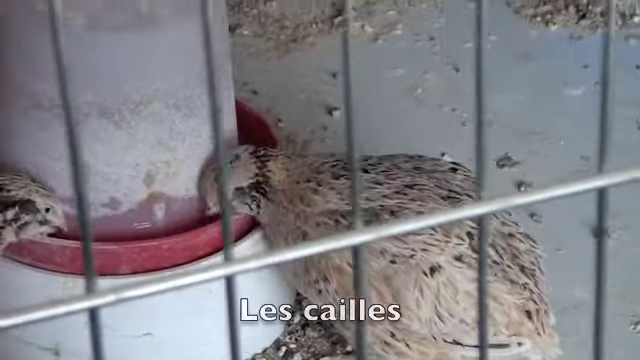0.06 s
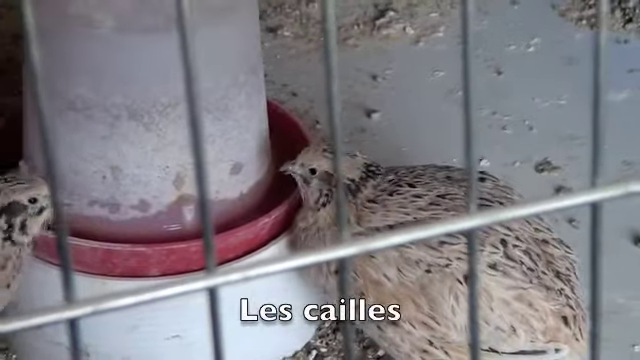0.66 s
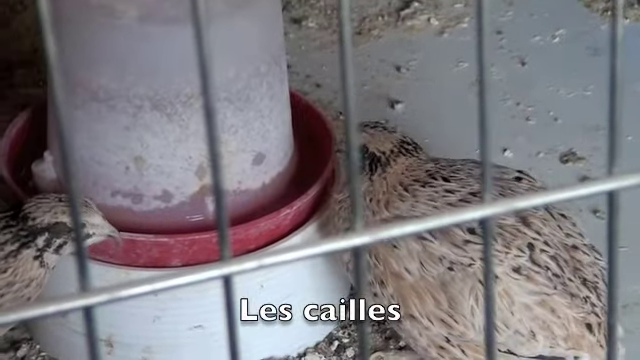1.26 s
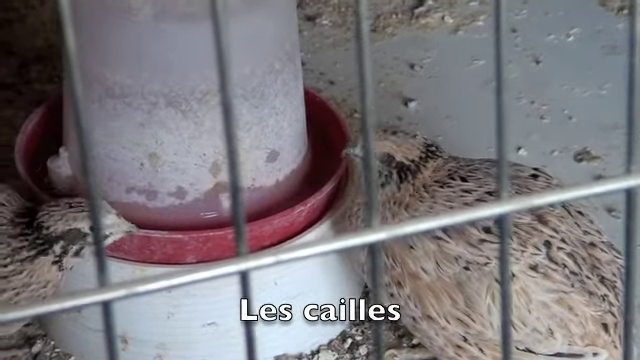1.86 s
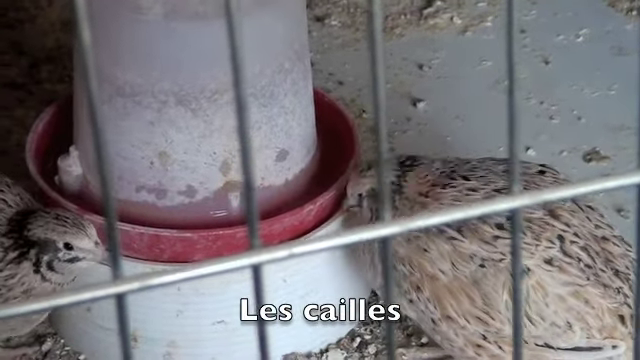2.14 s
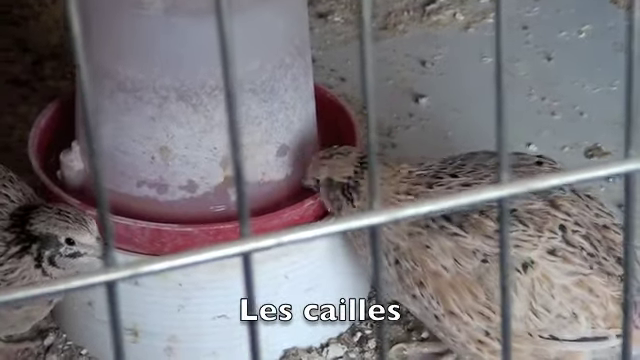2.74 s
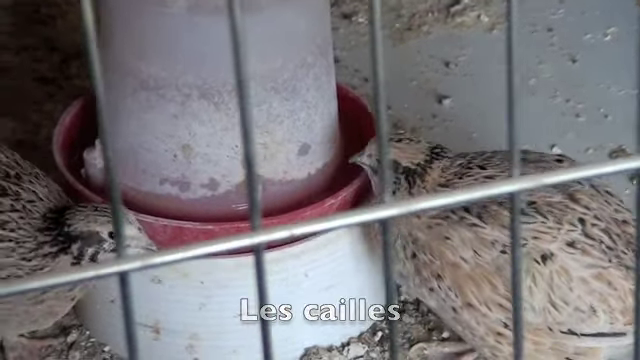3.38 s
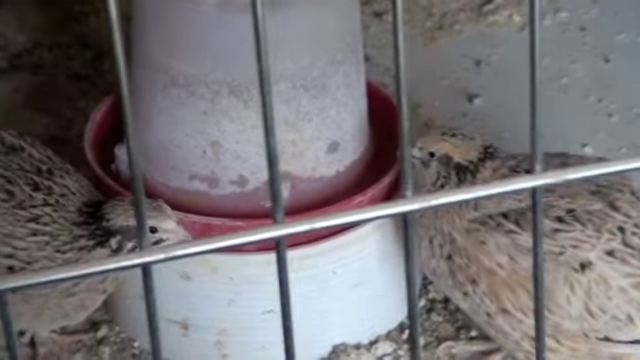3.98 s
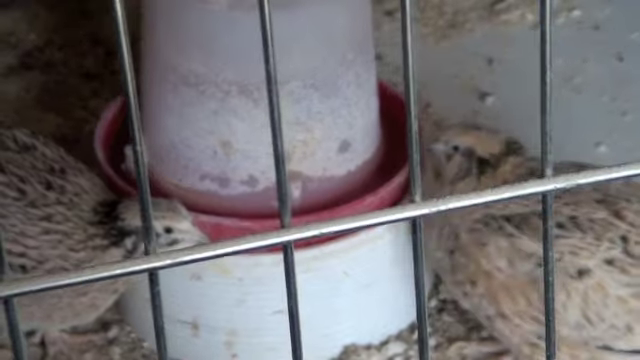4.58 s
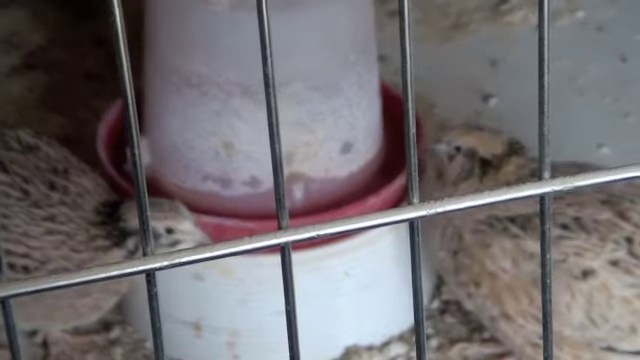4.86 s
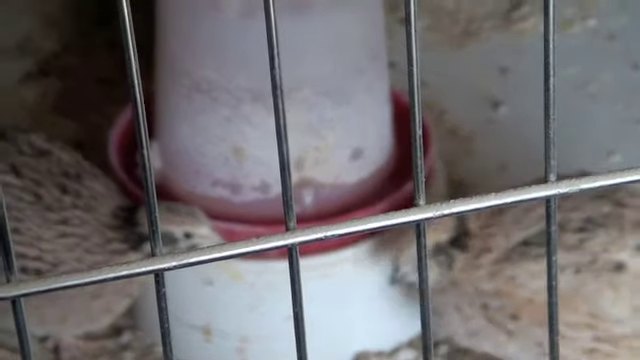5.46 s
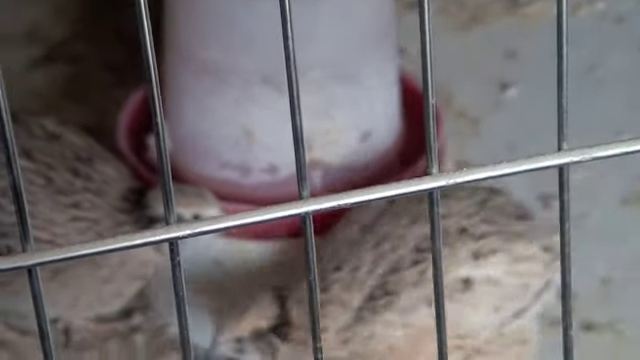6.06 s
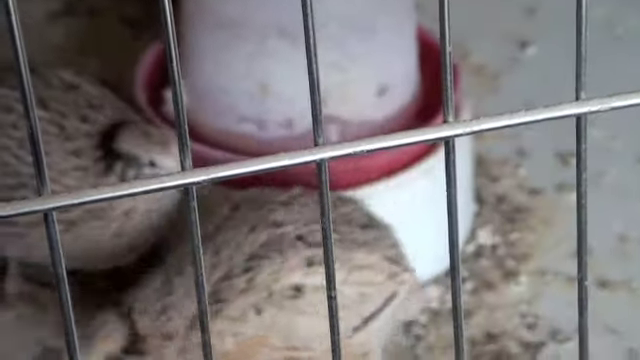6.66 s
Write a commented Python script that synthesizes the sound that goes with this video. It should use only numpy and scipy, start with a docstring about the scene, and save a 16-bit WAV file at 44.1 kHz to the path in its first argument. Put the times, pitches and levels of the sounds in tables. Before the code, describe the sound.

Small birds peck and step in a cage near the microphone, indoors. Sharp little taps on a plastic feeder mix with claw scrapes and gritty rustling, and a ringing footfall stands out early on. Short, quiet gliding peeps come before and after a cluster of louder pecks in the middle. The activity then softens to shuffling and dull floor taps, over steady hiss, low rumble, faint hum and a thin high whine.

```python
"""Quail peck and step in a wire cage, close by: beaks tap the plastic feeder and the floor, claws skid,
footfalls make the floor thud and ring, and dull bumps hit the cage. Feet and feathers stir the litter
into gritty clicks, and a bird peeps softly in short gliding whistles. A small hard room answers the taps.
Under it lie low rumble, hiss, a faint hum and a thin electronic whine."""
import sys
import numpy as np
from scipy import signal
from scipy.fft import rfft, irfft, next_fast_len
from scipy.io import wavfile
from scipy.ndimage import uniform_filter1d, map_coordinates

SR = 44100
rng = np.random.default_rng(int(sys.argv[2]) if len(sys.argv) > 2 else 0)


def wav_record(signal):
    """Record a signal, one row per channel, as 16-bit PCM in the file named by sys.argv[1]."""
    frames = np.transpose(np.atleast_2d(signal))
    bounded = np.clip(frames, -1, 1)
    # unit amplitude maps onto the largest positive 16-bit level
    quanta = np.round(bounded * 32767).astype(np.int16)
    wavfile.write(sys.argv[1], SR, quanta)


N = 296746

# Spectrum of stirred litter. Each row: frequency in Hz, relative density in dB.
LITTER_SPECTRUM = [(100, -24), (300, 11.5), (800, 3.5), (2000, 1), (4500, -0.5), (8000, -2.5), (15000, -1)]
# Stereo likeness of the room's sound. Each row: frequency in Hz, left-right correlation.
ROOM_CORRELATION = [(150, 0.85), (600, 0.53), (2500, 0.6), (4500, 0.86), (8000, 0.045), (14000, 0.12)]


def feeder_pecks(gain_db=-15, knock_db=-15, knock_follows=0.51, tick_db=-8):
    """Beaks tap the plastic feeder; in a bright tap the edge stands out over the body."""
    # Each row: start in seconds, relative level in dB, body and edge resonances in Hz,
    # brightness in dB, resonance height in dB, room tail offset in dB.
    pecks = [(0.125, -40.5, 1780, 5440, 4.5, 6.5, -5.5), (0.326, -43.5, 1480, 3700, -0.5, 7, -4),
             (0.358, -27.5, 1190, 3500, -20.5, 10.5, -2), (1.823, -38, 1800, 2190, -4, 10.5, 1),
             (1.962, -39, 790, 2600, -0.5, 2.5, -2), (2.992, -33.5, 1300, 3320, -7.5, 8, -3),
             (3.156, -22.5, 1680, 2440, -12, 11, -1.5), (3.398, -23.5, 1070, 6640, -3.5, 2.5, -3.5),
             (3.575, -48, 1720, 2240, 3.5, 11, -2.5)]
    out = np.zeros((2, N))
    for start_s, db, body_hz, edge_hz, bright_db, ring_db, wet_db in pecks:
        bands_db = (knock_db + knock_follows * bright_db, 0, bright_db, bright_db + tick_db)
        blow = contact(body_hz, edge_hz, bands_db, ring_db, top_hz=7100, travel_s=0.00093)
        add(out, amp(db + gain_db) * room(blow, wet_db, lag_s=0.000042), start_s)
    return out


def floor_pecks(gain_db=-15, knock_db=-17, tick_db=-22):
    """Beaks tap the littered floor: light, dull, hardly any tick."""
    # Each row: start in seconds, relative level in dB, body resonance in Hz, brightness in dB.
    pecks = [(5.281, -40, 800, -5.5), (5.803, -45, 870, -0.5), (6.148, -50.5, 820, -24),
             (6.247, -55, 640, -13)]
    out = np.zeros((2, N))
    for start_s, db, body_hz, bright_db in pecks:
        bands_db = (knock_db, 0, bright_db, bright_db + tick_db)
        blow = contact(body_hz, edge_hz=1370, bands_db=bands_db, ring_db=10, top_hz=5560,
                       travel_s=0.00094)
        add(out, amp(db + gain_db) * room(blow, wet_db=-3.5), start_s)
    return out


def steps(scuff_db=-17.5, knock_db=-7, tick_db=-15, floor_db=-14, weight_db=-11, weight_hz=165):
    """A bird's weight lands with a scuff; the heavier the step, the more the floor thuds and rings."""
    # Each row: start in seconds, relative level in dB, body resonance in Hz, brightness in dB.
    footfalls = [(0.293, -42, 666, -1), (1.648, -28.5, 890, -6.5), (1.711, -40.5, 1780, 1),
                 (1.823, -33.5, 693, -2.5), (2.062, -16, 1000, -10), (4.847, -29.5, 760, -8.5),
                 (5.197, -41, 696, -10), (5.482, -49, 880, -10)]
    out = np.zeros((2, N))
    for start_s, db, body_hz, bright_db in footfalls:
        bands_db = (knock_db, 0, bright_db, bright_db + tick_db)
        click = contact(body_hz, edge_hz=1860, bands_db=bands_db, ring_db=12, top_hz=4960,
                        travel_s=0.00067)
        blow = scuff(click, decay_s=0.0027, catch=0.73)
        add(out, amp(db + scuff_db) * room(blow, wet_db=1), start_s)
        add(out, amp(db + floor_db) * floor_ring(), start_s)
        add(out, amp(db + weight_db) * thud(weight_hz), start_s)
    return pan_left(out, db=1.2)


def scratches(gain_db=-16, knock_db=-13, edge_db=-3, edge_follows=0.14, tick_db=-10):
    """Claws skid on the floor; sharpness lifts the tick most and the edge a little."""
    # Each row: start in seconds, relative level in dB, sharpness in dB.
    skids = [(0.024, -50, 14), (0.336, -34.5, -10), (0.44, -41.5, -3), (0.471, -42.5, -28),
             (0.524, -48.5, 10), (1.603, -42.5, 7.5), (1.75, -43, -11), (1.915, -44.5, 1),
             (3.527, -34, -7.5), (3.547, -42.5, -1), (3.654, -37.5, -10.5), (3.69, -39.5, -4.5),
             (3.756, -43, -3), (3.984, -44, -8), (4.038, -46, 1.5), (4.758, -47.5, 1), (6.373, -51, 4)]
    out = np.zeros((2, N))
    for start_s, db, sharp_db in skids:
        bands_db = (knock_db, 0, edge_db + edge_follows * sharp_db, tick_db + sharp_db)
        click = contact(body_hz=1680, edge_hz=3460, bands_db=bands_db, ring_db=3.5, top_hz=5160,
                        travel_s=0.00063)
        blow = scuff(click, decay_s=0.0034, catch=0.59)
        add(out, amp(db + gain_db) * room(blow), start_s)
    return out


def cage_bumps():
    """Dull bumps against the cage."""
    # Each row: start in seconds, level in dB before panning, frequency in Hz.
    bumps = [(0.096, -42, 248), (0.744, -44.5, 240), (2.062, -31, 100), (3.345, -42, 56),
             (3.634, -39.5, 414), (4.683, -39, 63), (4.836, -32, 283)]
    out = np.zeros((2, N))
    for start_s, db, hz in bumps:
        add(out, amp(db) * thud(hz), start_s)
    return pan_left(out, db=3.5)


def contact(body_hz, edge_hz, bands_db, ring_db, top_hz, travel_s):
    """A blow of a few cycles: two damped resonances stand on a broad click."""
    knock, body, edge, tick = bands_db
    click_db = [(50, knock - 6), (140, knock + 12), (0.5 * body_hz, knock + 12),
                (0.81 * body_hz, body + 9 - ring_db / 2), (2300, body + 8 - ring_db / 2),
                (3200, edge + 5), (top_hz, edge + 3),
                (1.61 * top_hz, tick + 6), (13000, tick + 4), (16000, tick - 6)]

    def gain(hz):
        peak = lambda centre_hz, width: 1 / (1 + (np.log((hz + 1) / centre_hz) / width) ** 2)
        resonances = peak(body_hz, width=0.097) + 0.99 * peak(edge_hz, width=0.24)
        return amp(log_interp(click_db, hz) + ring_db * resonances)

    # Bending waves disperse: treble arrives first, 1 kHz after travel_s.
    dispersion = lambda hz: np.exp(-4j * np.pi * travel_s * np.sqrt(1000 * hz))
    return np.sqrt(SR) * filtered(min_phase_pulse(gain), dispersion)


def scuff(click, decay_s, catch, size=2048):
    """A claw catches, then skids through tiny contacts: the click smears but keeps its colour."""
    contacts = rng.standard_normal(size) * np.exp(-np.arange(size) / SR / decay_s)
    contacts[0] = catch * np.linalg.norm(contacts)
    spectrum = rfft(contacts)
    whitened = spectrum / np.sqrt(uniform_filter1d(np.abs(spectrum) ** 2, size=5))
    return signal.fftconvolve(click, irfft(whitened)[:size // 2])


def floor_ring(spread_db=1.2, attack_s=0.001, size=SR // 3):
    """The cage floor's modes ring at slightly new strengths with every blow."""
    # Each row: frequency in Hz, relative level in dB, T60 in seconds.
    modes = [(91, -14, 0.071), (173, -27, 0.16), (331, -1, 0.26), (462, -4, 0.33), (632, 1, 0.22),
             (755, -0.5, 0.28), (870, 2.5, 0.26), (1020, -12, 0.28), (1660, -14, 0.28), (1970, -22, 0.22),
             (2184, -16, 0.22), (3730, -13, 0.23), (4400, -32, 0.11)]
    hz, db, t60_s = np.transpose(modes)[:, :, None]
    t = np.arange(size) / SR
    decay = amp(db + spread_db * rng.standard_normal(hz.shape) - 60 * t / t60_s)
    partials = decay * np.sin(2 * np.pi * (hz * t + rng.random(hz.shape)))
    return partials.sum(axis=0) * (1 - np.exp(-t / attack_s))


def thud(hz, cycles=2.1, size=SR // 4):
    """A soft push: a sine that swells and dies within a few cycles."""
    turns = hz * np.arange(size) / SR
    age = turns / cycles
    return np.sin(2 * np.pi * turns) * 2 * age * np.exp(1 - 2 * age)


def litter_strokes(grains_per_s=700, spread_db=5, swish=0.27, size=SR // 2):
    """Feet and feathers sweep the litter: uneven clicks of grit in a swish that swells and fades."""
    # Each row: peak time in seconds, level in dB, half length in seconds, colour centre in Hz.
    strokes = [(0.013, -43.5, 0.033, 3200), (0.274, -45.5, 0.042, 2940), (0.343, -40.5, 0.016, 1800),
               (0.903, -53.5, 0.018, 3000), (1.687, -37, 0.045, 870), (1.743, -50.5, 0.1, 6000),
               (1.894, -42.5, 0.01, 5100), (2.154, -45.5, 0.032, 10000), (2.301, -51.5, 0.026, 4040),
               (2.999, -51.5, 0.17, 1940), (3.363, -45, 0.11, 1550), (3.756, -49, 0.34, 1290),
               (3.932, -45, 0.044, 2760), (4.191, -51, 0.016, 1970), (4.81, -41.5, 0.081, 1530),
               (4.871, -40.5, 0.024, 1000), (4.965, -47.5, 0.054, 1760), (5.131, -51, 0.044, 4270),
               (5.428, -54.5, 0.082, 4050), (5.757, -51.5, 0.089, 2800)]
    out = np.zeros((2, N))
    t = (np.arange(size) - size // 2) / SR
    for peak_s, db, half_s, centre_hz in strokes:
        grains = (rng.random(size) < grains_per_s / SR) * rng.standard_normal(size)
        grains *= amp(spread_db * np.minimum(rng.exponential(size=size), 2))
        grit = litter_colour(unit_rms(grains) + swish * rng.standard_normal(size), centre_hz)
        stroke = grit * amp(db) * np.exp(-(t / half_s) ** 2)
        add(out, room(stroke[t >= -peak_s]), peak_s + t[0])
    return out


def shuffle(swing_db=3, swing_per_s=12):
    """Restless birds shift about in the litter: a soft, uneven rustle."""
    # Each row: time in seconds, level in dB.
    contour = [(3.5, -66.5), (5.2, -60), (5.8, -58.5), (6.73, -64.5)]
    times_s, levels_db = np.transpose(contour)
    db = np.interp(np.arange(N) / SR, times_s, levels_db, left=-200, right=-200)
    envelope = amp(db + swing_db * wobble(swing_per_s))
    return envelope * litter_colour(stereo_noise(ROOM_CORRELATION), centre_hz=1100)


def litter_colour(x, centre_hz, focus_db=3):
    """Give x the litter's spectrum, focused around centre_hz, at rms 1."""
    cut_db = lambda hz: focus_db * np.minimum(np.log2((hz + 1) / centre_hz) ** 2, 4)
    return unit_rms(filtered(x, lambda hz: amp(log_interp(LITTER_SPECTRUM, hz) - cut_db(hz))))


def peeps(quaver=0.034, quaver_per_s=495, rasp_db=2, rasp_per_s=268, overtone_db=-22):
    """A bird's thin, slightly hoarse whistles: each swells and fades as its pitch bends in one arc."""
    # Each row: start and length in seconds, first, middle and last pitch in Hz, level in dB.
    calls = [(2.595, 0.066, 1580, 1690, 1470, -52), (2.638, 0.03, 1590, 2130, 2230, -52),
             (2.728, 0.035, 2470, 3000, 2730, -45), (2.769, 0.0403, 2780, 2170, 2510, -44),
             (4.14, 0.021, 1880, 2130, 1950, -52), (4.25, 0.042, 2940, 2450, 2060, -47.5),
             (4.287, 0.025, 2530, 2350, 2550, -46.5), (5.88, 0.15, 3150, 3400, 3850, -59)]
    out = np.zeros((2, N))
    for start_s, length_s, first_hz, middle_hz, last_hz, db in calls:
        progress = np.linspace(0, 1, round(length_s * SR))
        arc = np.polyfit([0, 0.5, 1], [first_hz, middle_hz, last_hz], 2)
        pitch_hz = np.polyval(arc, progress) * (1 + quaver * wobble(quaver_per_s, len(progress)))
        phase = 2 * np.pi * np.cumsum(pitch_hz) / SR
        swell = np.abs(np.sin(np.pi * progress)) ** 0.51
        envelope = swell * amp(db + rasp_db * wobble(rasp_per_s, len(progress)))
        voice = envelope * (np.sin(phase) + amp(overtone_db) * np.sin(2 * phase))
        add(out, room(voice, wet_db=-5), start_s)
    return out


def room(sound, wet_db=0, lag_s=0.000025, bounce=0.66, bounce_s=0.0018, build_s=0.0023, size=SR // 3):
    """A fresh stereo path through the small hard room: direct sound, floor bounce, dense tail."""
    # Each row: frequency in Hz, T60 in seconds.
    decay_times = [(150, 0.18), (600, 0.32), (1200, 0.25), (2000, 0.28), (4500, 0.27), (9000, 0.21),
                   (15000, 0.17)]
    # Each row: frequency in Hz, tail level re the direct sound in dB before wet_db.
    tail_levels = [(200, 12), (1000, 6), (2000, 3.5), (4500, 10.5), (9000, 6), (15000, 7)]
    hz, t, noise = signal.stft(stereo_noise(ROOM_CORRELATION, size), SR, nperseg=128)
    t60_s = log_interp(decay_times, hz)[:, None]
    fade = amp(log_interp(tail_levels, hz)[:, None] + wet_db - 60 * t / t60_s)
    fade *= np.sqrt(2 * np.log(1000) / (t60_s * SR))  # tail energy independent of T60
    path = signal.istft(noise * fade, SR, nperseg=128)[1][:, :size]
    path *= 1 - np.exp(-(np.arange(size) / SR / build_s) ** 2)
    path[:, 0] += 1
    path[:, round(bounce_s * SR * np.exp(0.15 * rng.standard_normal()))] += bounce
    path[1] = np.roll(path[1], round(lag_s * SR))  # the left microphone is reached first
    path /= np.sqrt(np.sum(path ** 2) / 2)
    return signal.fftconvolve(sound[None], path, axes=1)


def rumble(level_db=-43.5, swing_db=1.5, swing_per_s=2.71):
    """Low noise whose level wanders slowly."""
    # Each row: frequency in Hz, relative density in dB.
    spectrum = [(5, 2.5), (14, 7.5), (22, 8), (34, -8.5), (52, -1.5), (72, -8.5), (105, -12), (160, -19),
                (280, -17), (600, -38)]
    noise = stereo_noise(correlation=[(24, -0.17), (45, 0.92), (200, 0.06)])
    low = unit_rms(filtered(noise, lambda hz: amp(log_interp(spectrum, hz))))
    return amp(level_db + swing_db * wobble(swing_per_s)) * low


def room_tone(level_db=-57, band_hz=5200, width_hz=300, band_db=5):
    """Steady room noise and hiss with one faint narrow band."""
    # Each row: frequency in Hz, relative density in dB.
    spectrum = [(71, -44.5), (120, -13), (173, -20), (203, -12.5), (270, -21.5), (311, -18.5), (414, -12.5),
                (776, -13.5), (1510, -23), (1640, -16.5), (1820, -21.5), (3210, -22), (5010, -22.5),
                (12200, -30), (15300, -27)]
    # Each row: frequency in Hz, left-right correlation.
    correlation = [(150, 0.26), (500, 0.092), (1400, 0.22), (4000, 0.39), (8000, 0.021), (15000, 0.18)]
    lift_db = lambda hz: band_db * np.exp(-((hz - band_hz) / width_hz) ** 2)
    hiss = filtered(stereo_noise(correlation), lambda hz: amp(log_interp(spectrum, hz) + lift_db(hz)))
    return amp(level_db) * unit_rms(hiss)


def hum(hz=206.6, level_db=-62, drift_rad=0.19, swing_db=2.5):
    """A faint tone, slightly unsteady in phase and level."""
    tone = np.sin(2 * np.pi * hz * np.arange(N) / SR + drift_rad * wobble(3.95))
    return pan_left(tone * amp(level_db + swing_db * wobble(1.3)), db=1.5)


def whine(gain_db=2, drift_rad=0.2):
    """A thin electronic whistle: three close tones beat fifty times a second."""
    # Each row: frequency in Hz, relative level in dB.
    tones = [(15575, -71), (15625, -62), (15675, -71)]
    t = np.arange(N) / SR
    return sum(amp(db + gain_db) * np.sin(2 * np.pi * hz * t + drift_rad * wobble(60))
               for hz, db in tones)


def amp(db):
    """Decibels to gain."""
    return 10 ** (np.asarray(db) / 20)


def unit_rms(x):
    """Scale to rms 1."""
    return x / np.sqrt(np.mean(x ** 2) + 1e-20)


def pan_left(x, db):
    """Left channel up by db, right channel down by db."""
    return x * amp([[db], [-db]])


def log_interp(points, hz):
    """Read (Hz, value) points on a log frequency axis."""
    knots_hz, values = np.transpose(points)
    return np.interp(np.log(hz + 1), np.log(knots_hz + 1), values)


def wobble(knots_per_s, size=N):
    """A smooth random curve."""
    knots = rng.standard_normal(int(size * knots_per_s / SR) + 4)
    return map_coordinates(knots, [np.arange(size) * knots_per_s / SR])


def filtered(x, response):
    """Apply response(hz) to the spectrum of x."""
    size = x.shape[-1]
    padded = next_fast_len(size + 4096)
    return irfft(rfft(x, padded) * response(np.fft.rfftfreq(padded, 1 / SR)), padded)[..., :size]


def stereo_noise(correlation, size=N):
    """White noise in two channels, alike as set by (Hz, correlation) points."""
    angle = lambda hz: np.arccos(np.clip(log_interp(correlation, hz), -1, 1)) / 2
    shares = lambda hz: np.array([np.cos(angle(hz)), np.sin(angle(hz))])
    mid, side = filtered(rng.standard_normal((2, size)), shares)
    return np.array([mid + side, mid - side])


def min_phase_pulse(gain, size=2048):
    """The shortest causal pulse with magnitude gain(hz)."""
    cepstrum = irfft(np.log(np.maximum(gain(np.fft.rfftfreq(size, 1 / SR)), 1e-7)))
    cepstrum[1:size // 2] *= 2
    cepstrum[size // 2 + 1:] = 0
    return irfft(np.exp(rfft(cepstrum)))


def add(track, sound, start_s):
    """Mix a sound in at start_s, no earlier than zero."""
    start = max(round(start_s * SR), 0)
    track[:, start:start + sound.shape[-1]] += sound[..., :N - start]


def scene():
    """The birds, a little to the left, over the steady sounds of the room."""
    impacts = feeder_pecks() + floor_pecks() + steps() + scratches() + cage_bumps()
    birds = impacts + litter_strokes() + shuffle() + peeps()
    return birds + rumble() + room_tone() + hum() + whine()


def record(dry, top_hz=16000):
    """The camera keeps nothing above its band limit."""
    return filtered(dry, lambda hz: hz < top_hz)


dry = scene()
out = record(dry)
wav_record(out)
```